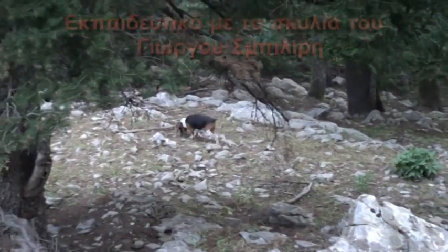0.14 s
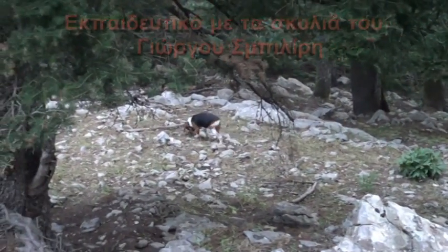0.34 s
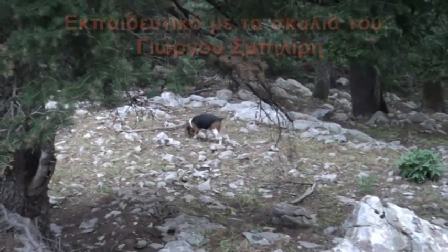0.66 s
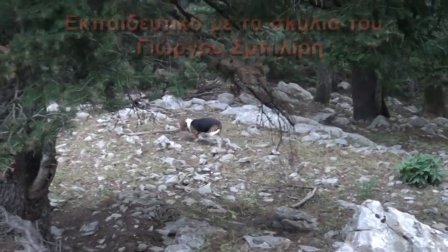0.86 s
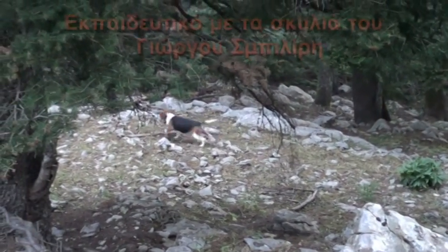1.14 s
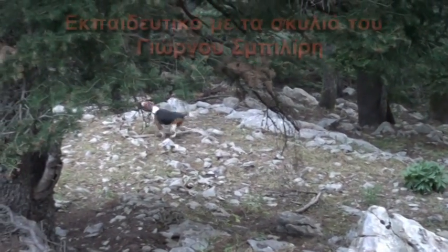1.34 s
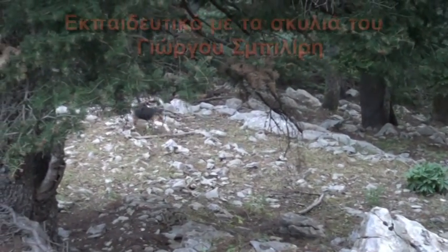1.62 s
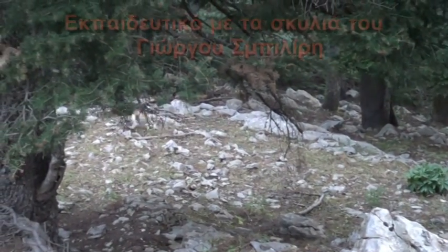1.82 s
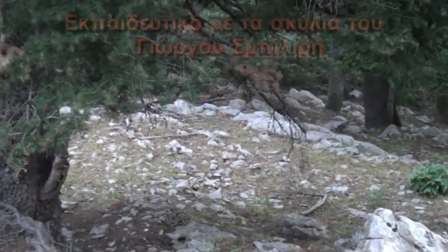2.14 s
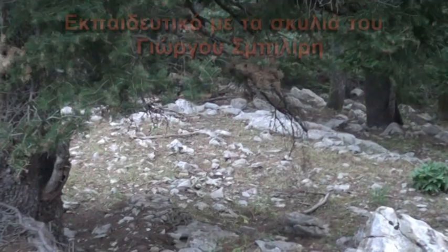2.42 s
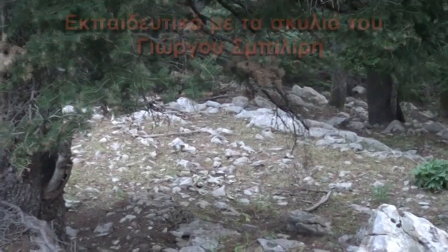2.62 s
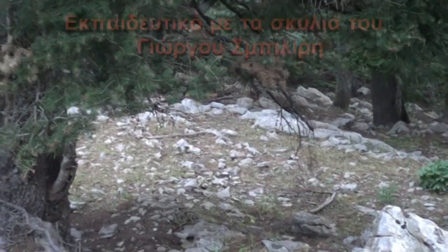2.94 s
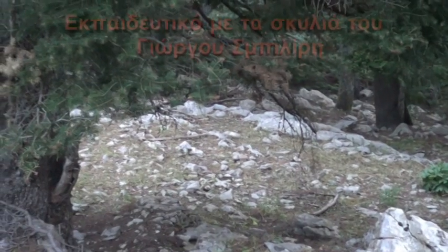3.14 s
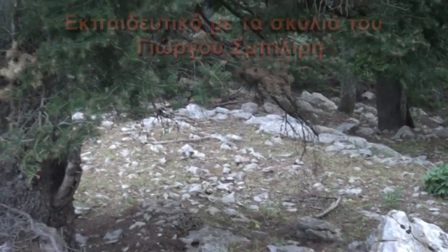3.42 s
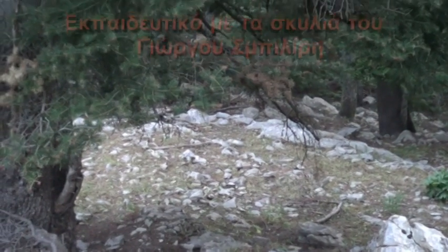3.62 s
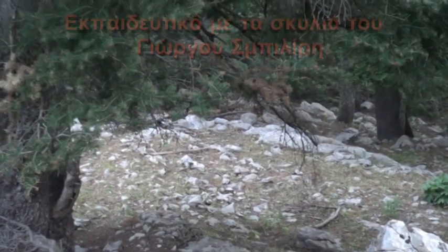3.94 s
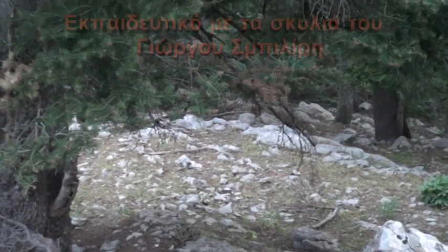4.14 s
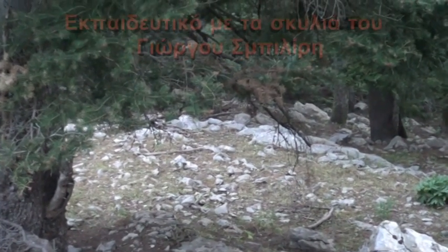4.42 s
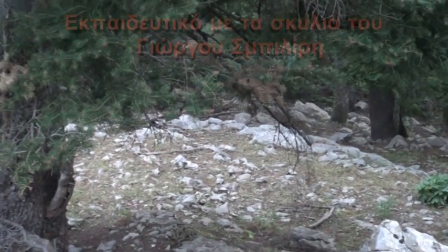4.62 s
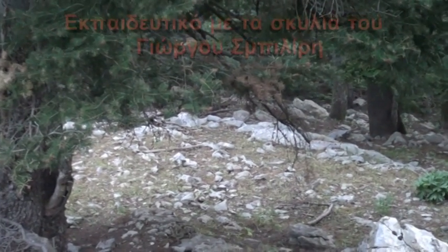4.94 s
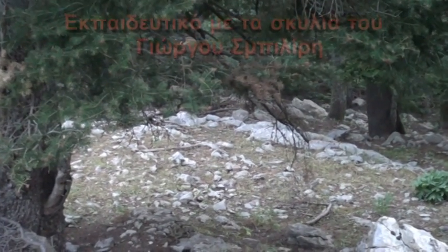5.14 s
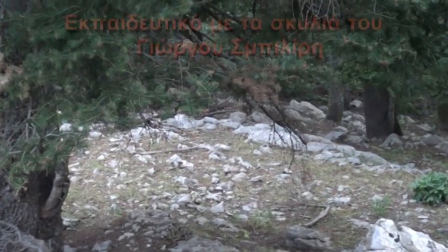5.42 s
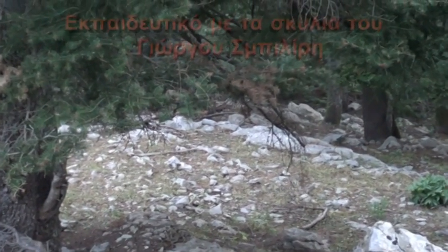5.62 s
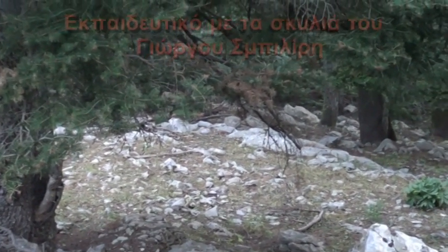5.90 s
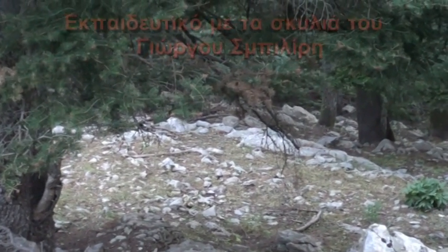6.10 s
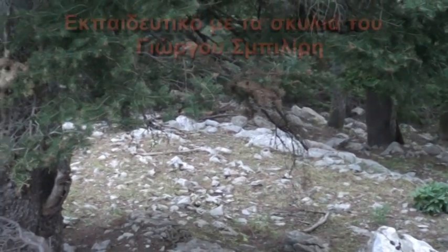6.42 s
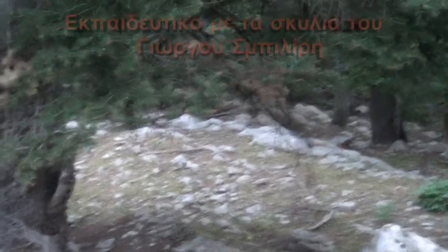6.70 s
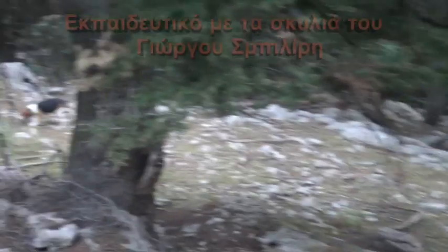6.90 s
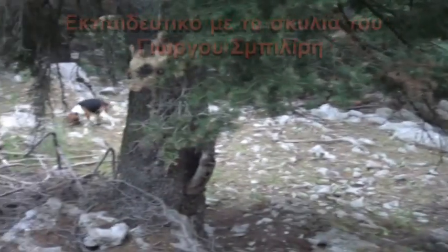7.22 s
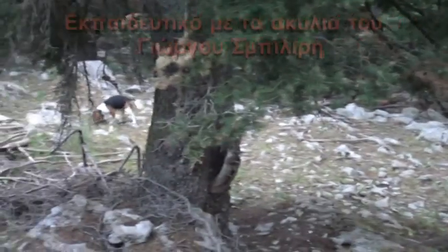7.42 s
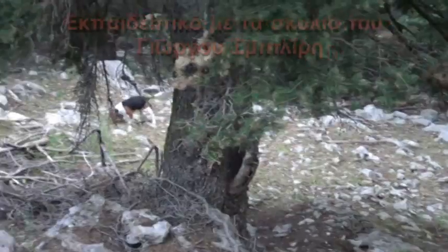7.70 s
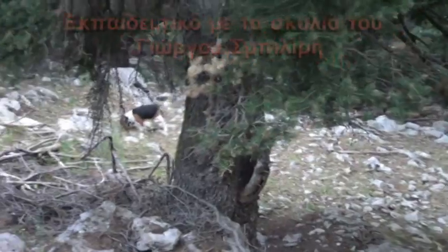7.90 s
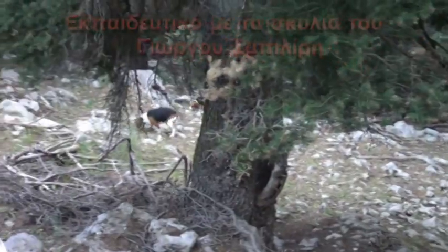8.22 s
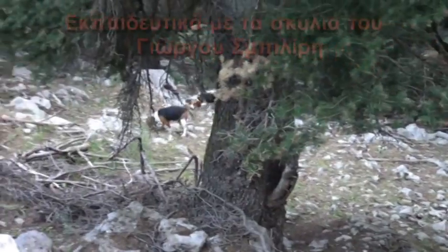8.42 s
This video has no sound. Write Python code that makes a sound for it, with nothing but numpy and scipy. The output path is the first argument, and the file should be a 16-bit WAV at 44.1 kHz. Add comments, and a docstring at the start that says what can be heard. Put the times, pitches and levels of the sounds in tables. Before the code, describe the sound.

On a quiet wooded hillside, small collar bells clank and jingle irregularly. Just after one second a nearby hound lets out a single loud bay, whooping up, breaking hoarse, climbing and dropping, with a long forest echo. Bells ring brightly afterward, then become duller and sparser. Faint birds whistle and chip, and a far dog yelps briefly. Outdoor stereo microphone, close bells and dog, soft air hush.

```python
"""A wooded hillside: a beagle gives one long bay, and the trees hold on to its hoarse tail.
The voice is a whoop of swept harmonics, then a near-sine that strain roughens with half-pitch lines and rasp.
Collar bells clank and jingle: clicks set ringing modes going, some in a lower voice. A paw scuff is clumped noise.
A far dog's two yelps and the small birds are swept tones. Shaped noise makes the forest echo, air and wind."""
import sys
import numpy as np
from scipy import signal
from scipy.fft import rfft, irfft, next_fast_len
from scipy.io import wavfile
from scipy.ndimage import uniform_filter1d

SR = 44100
rng = np.random.default_rng(int(sys.argv[2]) if len(sys.argv) > 2 else 0)


def wrap_up_sound(samples):
    """Save the sound to the file named by the first command line argument, as 16-bit audio."""
    columns = np.atleast_2d(samples).T
    # keep every value between -1 and 1, then stretch to whole-number steps
    tamed = np.clip(columns, -1, 1)
    steps = np.round(tamed * 32767).astype(np.int16)
    wavfile.write(sys.argv[1], SR, steps)


N = 377496
TIME = np.arange(N) / SR
CUTOFF_HZ = 15900

# Centre pitch of the bay, which scoops up, climbs, cracks and drops: [t/s, f/Hz]
BAY_PITCH = [(1.275, 574), (1.305, 633.8), (1.44, 639), (1.58, 658.3), (1.7, 680.2), (1.85, 708.5),
             (1.88, 665.4), (1.945, 678), (2.0, 575)]
# Hoarseness of the bay: [t/s, roughness (0 = clear, about 1 = fully strained)]
BAY_ROUGHNESS = [(1.28, .4), (1.31, 0.86), (1.43, 1.15), (1.5, 0.25), (1.6, .15), (1.79, .15), (1.83, 0.33),
                 (1.92, 0.74)]
# Opening whoop, centre pitch and loudness: [t/s, f/Hz, level/dB]
WHOOP_CURVE = [(1.22, 870, -46), (1.238, 946, -16), (1.245, 1086, -23), (1.254, 1064, -13.5),
               (1.272, 1080, -23.5), (1.298, 1223, -15.5)]
# Relative strength of the whoop's harmonics, from the first up: [level/dB]
WHOOP_HARMONICS = [-1, -8.5, -21.5, -23.5]
# Tone shaping by the throat, relative: [f/Hz, level/dB]
THROAT_TONE = [(500, 2), (950, 5.5), (2000, -7), (2750, -21), (3200, -41), (7500, -24), (14000, -64)]
# Collar bell clanks; "humming" is a lower-voiced ring, probably another dog's bell:
# [t/s, strength/dB, kind of clank]
BELL_CLANKS = [(.003, -26, "humming"), (.203, -18, "full"), (.367, -22.5, "dull"), (.525, -22.5, "humming"),
               (.743, -36, "humming"), (.853, -30, "pinging"), (.922, -17.5, "full"), (1.011, -28, "full"),
               (1.141, -22, "full"), (1.169, -20, "full"), (1.631, -19.5, "dull"), (2.037, -24, "ringing"),
               (2.084, -18, "ringing"), (2.538, -16, "ringing"), (2.674, -20, "ringing"),
               (2.815, -17.5, "ringing"), (3.127, -18, "ringing"), (3.349, -28.5, "bright"),
               (3.646, -21.5, "dull"), (3.766, -22, "dull"), (4.029, -33.5, "humming"),
               (4.222, -30.5, "dull"), (4.399, -31.5, "bright"), (4.658, -24, "dull"),
               (4.891, -40, "pinging"), (5.07, -27, "dull"), (5.225, -27.5, "dull"), (5.408, -23, "dull"),
               (5.5, -15.5, "dull"), (5.972, -29, "dull"), (6.37, -21, "dull"), (6.549, -31, "pinging"),
               (6.762, -28, "pinging"), (6.809, -26, "dull"), (7.417, -30.5, "pinging"),
               (7.585, -25, "bright"), (7.695, -34, "humming"), (7.763, -25, "humming"),
               (8.328, -22, "full")]
# Bell modes in five families (clank, hum, 4.8 kHz ping, 5.6 kHz ping, treble): [f/Hz, level/dB, t60/s]
BELL_MODES = [
    [(2019, -2, 0.13), (1814, -12.5, .025)],
    [(2126, -3, 0.21), (2273, -20.5, 0.083), (5318, -8, 0.17), (10030, -24, 0.12)],
    [(3446, -10, 0.14), (4740, -6, 0.047), (4829, -4.5, 0.2207)],
    [(5618, 2.5, 0.22)],
    [(7227, -17, 0.17), (7800, -13, 0.21), (8170, -16.5, 0.1), (8910, -10.5, .1), (9530, -15.5, 0.0756),
     (11074, -14, .13), (11640, -21, .11), (12175, -20, 0.33), (15300, -23.5, .08)],
]
# How hard each kind of clank drives the five families:
# kind -> [clank/dB, hum/dB, 4.8 kHz ping/dB, 5.6 kHz ping/dB, treble/dB]
CLANK_DRIVE = {"dull": (-0.5, -33, -14.5, -30.5, -11.5), "ringing": (-1.5, -43, -21.5, -14, -12),
               "full": (-1, -21, -9.5, -19.5, -2.5), "pinging": (-5, -17.5, 0, -27, 4.5),
               "bright": (-7.5, -24, -6.5, -11, 8), "humming": (-10, -3.5, -21.5, -23, -5)}
# How hard a light touch drives the families: [clank/dB, hum/dB, 4.8 kHz ping/dB, 5.6 kHz ping/dB, treble/dB]
TOUCH_DRIVE = (-9.5, 3, -6, -15, -9.5)
# Strength of the random light touches: [t/s, level/dB]
JINGLE_LEVEL = [(.7, -51.5), (1.0, -31.5), (2.3, -51.5), (3.0, -34.5), (6.9, -52.5), (7.6, -44.5),
                (8.5, -53)]
# Paw on loose stones: [t/s, level/dB]
SCUFF_LEVEL = [(.805, -40), (.818, -40.5), (.836, -31.5), (.865, -39), (1.1, -59.5)]
# Relative tone of the grit: [f/Hz, level/dB per Hz]
GRIT_TONE = [(100, -7.5), (1600, 3.5), (6000, -9), (15000, -19)]
# Far yelps, before the final mix: [t/s, length/s, nominal f/Hz, level/dB]
FAR_YELPS = [(3.488, 0.106, 798, -35), (6.169, 0.024, 780, -42.5)]
# Arched bird note, level relative to its phrase: [t into note/s, f/Hz, level/dB]
ARCH_NOTE = [(0, 3490, 12), (.015, 4150, 22.5), (.032, 3500, 8), (.055, 2900, 21.5), (.07, 2820, -16.5)]
# Falling bird slur, level relative to its phrase: [t into note/s, f/Hz, level/dB]
SLUR_NOTE = [(0, 7400, 7.7), (.02, 5540, 17.7), (.038, 5100, 5)]
# Short falling bird chip, level relative to its phrase: [t into note/s, f/Hz, level/dB]
CHIP_NOTE = [(0, 3530, -14), (.006, 2926, -2.5), (.014, 2500, 3.5)]
# Thin far whistle, before the final mix: [t/s, level/dB]
WHISTLE_LEVEL = [(4.54, -50.5), (4.6, -32), (4.8, -71.5), (4.92, -35.5), (5.3, -43.5), (6.05, -40),
                 (7.4, -62.5)]
# Echo of the wooded hillside: [f/Hz, level/dB, t60/s]
FOREST_ECHO = [(686, 3.5, 2.3), (1390, 8.5, 1.2), (3500, 13, 0.85), (14200, -6.5, .3)]
# Relative tone of the open air: [f/Hz, level/dB per Hz]
AIR_TONE = [(30, -8.5), (500, -6.5), (1200, -12.5), (2300, -12), (5200, -16), (7000, -14), (15500, -30.5)]
# Wind gust on the microphone: [t/s, level/dB]
GUST_LEVEL = [(3.05, -80.5), (3.33, -47.5), (3.65, -79.5)]
# How alike diffuse noise is at left and right: [f/Hz, likeness (0-1)]
STEREO_LIKENESS = [(50, 0.8), (200, 0.54), (4000, 0.7), (12000, 1)]

ATTACK_S, RELEASE_S = 0.016, 0.089
FUNDAMENTAL_DB, THROAT_DB, MOUTH_DB = -10, -30, -39   # in a clear voice
# Full roughness (1) moves power from the fundamental upward
STRAIN_LOSS_DB, STRAIN_THROAT_DB, STRAIN_MOUTH_DB = 6, 14.5, 6.5
HALVES_FROM, HALVES_FULL = .12, 0.87   # roughness where half-pitch vibration begins and is complete
BREAK_DB, BREAK_S = 14.5, .025   # the throat bursts as the voice breaks out of the whoop
GAPE_AT_S, GAPE_S, GAPE_DB = 1.88, .16, 14.5   # the jaw opens widest near the end
DIP_AT_S, DIP_S, DIP_DB = 1.642, 0.021, 19.5   # the fundamental dips briefly in the held note


def from_db(db):
    """Decibels to gain."""
    return 10 ** (np.asarray(db) / 20)


def rms_one(x):
    """Scale to rms 1."""
    return x / np.sqrt(np.mean(x ** 2) + 1e-20)


def in_time(rows, t=TIME):
    """Draw each column of a curve at every sample."""
    s, *columns = np.transpose(rows)
    return [np.interp(t, s, c) for c in columns]


def during(rows):
    """Gate open while a curve lasts, with 3 ms edges."""
    since_start = TIME - rows[0][0]
    until_end = rows[-1][0] - TIME
    return np.clip(np.minimum(since_start, until_end) / .003, 0, 1)


def swell_at(s, width_s):
    """A smooth rise to 1 and back around a moment."""
    return np.exp(-((TIME - s) / width_s) ** 2)


def at_hz(points, hz, axis=1):
    """Read a spectrum on a log-frequency axis."""
    points = np.array(points, float)
    return np.interp(np.log(hz + 1e-3), np.log(points[:, 0]), points[:, axis])


def coloured(x, spectrum):
    """Give a sound a spectrum."""
    size = next_fast_len(N)
    gain = from_db(at_hz(spectrum, np.fft.rfftfreq(size, 1 / SR)))
    return irfft(rfft(x, size) * gain, size)[..., :N]


def cut(x, hz, kind, order=2):
    """Butterworth filter."""
    return signal.sosfilt(signal.butter(order, hz, kind, fs=SR, output="sos"), x)


def drift(rate_hz):
    """Random wander of rms 1, slower than a given rate."""
    settled = cut(rng.standard_normal(N + SR), rate_hz, "low")[SR:]
    return rms_one(settled)


def evened(x):
    """Level a sound to a short-time rms of 1."""
    return x / np.sqrt(np.abs(uniform_filter1d(x * x, size=700)) + 1e-9)


def stereo_noise(spectrum):
    """Noise arriving from all sides at two close microphones; rms 1."""
    size = next_fast_len(N)
    alike = np.clip(at_hz(STEREO_LIKENESS, np.fft.rfftfreq(size, 1 / SR)), 0, 1)
    mid, side = rfft(rng.standard_normal((2, size)))
    pair = irfft(np.sqrt(1 + alike) * mid + np.sqrt(1 - alike) * side * [[1], [-1]], size)
    return rms_one(coloured(pair[:, :N], spectrum))


def ring(clicks, hz, t60):
    """A resonator: a unit click sets a decaying sine of height 1 ringing."""
    r, w = from_db(-60 / (t60 * SR)), 2 * np.pi * hz / SR
    return signal.lfilter([0, np.sin(w)], [1, -2 * r * np.cos(w), r * r], clicks + 1e-18)


def turning(hz):
    """Phase of an oscillator that follows a pitch."""
    return 2 * np.pi * np.cumsum(hz) / SR


def placed(x, pan_db, lead_rad=.5):
    """Pan by level, positive to the left, with the left leading in phase."""
    turn = np.exp(.5j * lead_rad * np.array([[1], [-1]]))
    turned = np.real(signal.hilbert(x, next_fast_len(N))[:N] * turn)
    return turned * from_db([[pan_db / 2], [-pan_db / 2]])


def bay(jitter=.02, shimmer=.45, rasp=.55, throat_hz=800, mouth_hz=1800):
    """Vocal folds ring almost as a sine; when strained they shake, add half-pitch lines and rasp."""
    pitch, = in_time(BAY_PITCH)
    rough, = in_time(BAY_ROUGHNESS)
    halves = np.clip((rough - HALVES_FROM) / (HALVES_FULL - HALVES_FROM), 0, 1)
    low_db, throat_db, mouth_db = bay_levels(rough)
    attack = (TIME - BAY_PITCH[0][0]) / ATTACK_S
    release = (BAY_PITCH[-1][0] - TIME) / RELEASE_S
    envelope = np.clip(np.minimum(attack, release), 0, 1)
    phase = turning(pitch * (1 + jitter * rough * drift(25)))
    lines = 0
    for k in range(3, 18):   # multiples of half the pitch
        # under strain every line bends and breaks up on its own; the higher ones bend most
        bend = rough * (k / 3) * drift(28)
        strength = (halves if k % 2 else 1) * np.exp(shimmer * rough * drift(50))
        lines = lines + strength * np.cos(k * phase / 2 + bend)
    turbulence = 5 * rng.standard_normal(N) * (1 + np.cos(phase / 2) / 2)
    voice = coloured(lines + rasp * rough * turbulence, THROAT_TONE)
    throat = evened(cut(voice, [throat_hz, mouth_hz], "band", order=6))
    mouth = evened(cut(voice, mouth_hz, "high", order=8))
    fundamental = np.sqrt(2) * np.cos(phase) * (1 + rough * drift(45) / 10)
    cry = from_db(low_db) * fundamental + from_db(throat_db) * throat + from_db(mouth_db) * mouth
    return cut(envelope * cry, 330, "high", order=10)   # keep the bass below the fundamental clear


def bay_levels(rough):
    """Levels in dB of the fundamental, throat band and mouth band, set by strain and by the jaw."""
    since = np.maximum(TIME - BAY_PITCH[0][0], 0)
    low_db = FUNDAMENTAL_DB - STRAIN_LOSS_DB * rough - DIP_DB * swell_at(DIP_AT_S, DIP_S)
    throat_db = THROAT_DB + STRAIN_THROAT_DB * rough + BREAK_DB * np.exp(-since / BREAK_S)
    mouth_db = MOUTH_DB + STRAIN_MOUTH_DB * rough + GAPE_DB * swell_at(GAPE_AT_S, GAPE_S)
    return low_db, throat_db, mouth_db


def whoop(jitter=.025):
    """The voice starts in a high, clear register before it breaks downward."""
    pitch, level_db = in_time(WHOOP_CURVE)
    phase = turning(pitch * (1 + jitter * drift(220)))
    tone = sum(from_db(db) * np.sin((k + 1) * phase) for k, db in enumerate(WHOOP_HARMONICS))
    return during(WHOOP_CURVE) * from_db(level_db) * rms_one(tone)


def bells(spread_db=4.0, tick_db=-10, tick_s=0.0084, lowest_hz=1450, tick_top_hz=11000):
    """Clanks tick and ring the modes; random light touches jingle too, mostly in the hum,
    probably another dog's bell."""
    s = np.array([row[0] for row in BELL_CLANKS])
    strengths_db = np.transpose([db + np.array(CLANK_DRIVE[kind]) for _, db, kind in BELL_CLANKS])
    at, out = np.round(s * SR).astype(int), np.zeros(N)
    moments = rng.random(N) < 40 / SR   # about 40 a second
    touches = moments * from_db(in_time(JINGLE_LEVEL)[0])
    for family, clank_db, touch_db in zip(BELL_MODES, strengths_db, TOUCH_DRIVE):
        for k, (hz, db, t60) in enumerate(family):
            # a soft touch is dull
            clicks = from_db(touch_db) * touches * rng.standard_normal(N) * lowest_hz / hz
            # the further modes of a family vary from clank to clank
            variation_db = (k > 0) * spread_db * rng.standard_normal(len(at))
            clicks[at] += from_db(clank_db + db + variation_db)
            waver = from_db(2 * drift(60))   # swinging makes each mode waver
            out += ring(clicks, hz, t60) * waver
    contact = np.zeros(N)
    contact[at] = from_db(strengths_db[-1] + tick_db)
    tick_fade = signal.lfilter([1], [1, -np.exp(-1 / (tick_s * SR))], contact + 1e-18)
    tick = cut(tick_fade * rng.standard_normal(N), [2 * lowest_hz, tick_top_hz], "band")
    return cut(out + tick, lowest_hz, "high", order=8)   # such small shells radiate no bass


def scuff(grain_db=3):
    """Grit shifts in clumps under a paw: noise with a fast random level."""
    level_db, = in_time(SCUFF_LEVEL)
    return during(SCUFF_LEVEL) * from_db(level_db + grain_db * drift(87)) * stereo_noise(GRIT_TONE)


def yelps(jitter=0.13, overtone_db=-6):
    """A far dog's short, rough cries: a shaking tone and its octave."""
    out, shake = np.zeros(N), 1 + jitter * drift(74.6)
    for s, length, hz, db in FAR_YELPS:
        arc = np.sin(np.pi * np.clip((TIME - s) / length, 0, 1))
        phase = turning(hz * shake * (.95 + 0.0596 * arc))
        out += from_db(db) * arc * (np.sin(phase) + from_db(overtone_db) * np.sin(2 * phase))
    return out


def phrase(note, start, period, level_db, count):
    """A bird repeats one swept note, a little different each time."""
    out, t = np.zeros(N + SR), np.arange(int(note[-1][0] * SR)) / SR
    pitch, db = in_time(note, t)
    for k, (tune, loud) in enumerate(rng.standard_normal((count, 2))):
        i = int((start + k * period) * SR)
        quiver = .04 * (tune + drift(300)[:len(t)])
        out[i:i + len(t)] += from_db(level_db + db + 2 * loud) * np.sin(turning(pitch * (1 + quiver)))
    return out[:N]


def birds(first_db=-62, second_db=-58, slur_db=-52, chip_db=-40):
    """Small songbirds in the firs: swept whistles in arches, slurs and chips."""
    arches = phrase(ARCH_NOTE, 2.26, .148, first_db, count=4)
    arches += phrase(ARCH_NOTE, 7.999, .146, second_db, count=4)
    slurs = phrase(SLUR_NOTE, 4.758, .362, slur_db, count=5)
    chips = phrase(CHIP_NOTE, 6.194, .144, chip_db, count=8)
    return arches + slurs + chips


def thin_tone(hz=4350):
    """A far bird's thin whistle comes in long notes that swell and fade."""
    level_db, = in_time(WHISTLE_LEVEL)
    swell = np.abs(np.sin(np.pi * (TIME - WHISTLE_LEVEL[0][0]) / .35))   # one note every .35 s
    waver = 1 + .004 * (swell + drift(60))
    return during(WHISTLE_LEVEL) * from_db(level_db) * swell * np.sin(turning(hz * waver))


def warble(hz=4000, swing=0.13, level_db=-44):
    """A songbird deep in the wood sweeps quickly up and down in short syllables."""
    song = np.sin(np.pi * np.clip((TIME - 2.3) / 3.1, 0, 1))
    syllables = np.clip(drift(14.5), 0, 1)
    return from_db(level_db) * song * syllables * np.sin(turning(hz * np.exp(swing * drift(20))))


def forest(x, early_db=9, early_s=0.066):
    """Near trunks and rocks scatter at once; the far hillside answers longer, the low tones lasting longest."""
    t, echo = TIME[:3 * SR], 0
    white = stereo_noise([(20, 0), (20000, 0)])[:, :len(t)]
    edges = np.geomspace(200, 16000, num=10)
    for low, high in zip(edges, edges[1:]):
        hz = np.sqrt(low * high)
        decay_db = at_hz(FOREST_ECHO, hz) - 60 * t / at_hz(FOREST_ECHO, hz, axis=2)
        echo = echo + cut(white, [low, high], "band") * from_db(decay_db)
    early = 1 + from_db(early_db) * np.exp(-t / early_s)
    onset = np.clip(t / .015, 0, 1)
    echo = echo * early * onset / np.sqrt(SR)
    return signal.fftconvolve(x[None], echo, axes=1)[:, :N]


def open_air(level_db=-55):
    """The steady hush of the hillside: wide coloured noise."""
    return from_db(level_db) * stereo_noise(AIR_TONE)


def wind():
    """A gust rumbles on the microphone: low noise, separate at each side."""
    rumble = rms_one(cut(rng.standard_normal((2, N)), 90, "low"))
    return from_db(in_time(GUST_LEVEL)[0]) * rumble


def scene():
    """The baying hound and the bells are near; the birds and the far dog come mostly through the trees."""
    hound, collars = bay() + whoop(), bells()
    far = birds() + yelps() + thin_tone()
    near = placed(hound, pan_db=-.6) + placed(collars, pan_db=.9)
    sends = from_db(-7.5) * hound + from_db(-5) * collars + from_db(-7.0) * far + warble()
    return near + far / 2 + scuff() + forest(sends) + open_air() + wind()


def record(dry, ceiling=.62):
    """The loudest peaks are rounded and the top is cut."""
    rounded = dry / (1 + (dry / ceiling) ** 8) ** (1 / 8)
    return signal.sosfilt(signal.ellip(10, .1, 80, CUTOFF_HZ, fs=SR, output="sos"), rounded)


dry = scene()
out = record(dry)
wrap_up_sound(out)
```